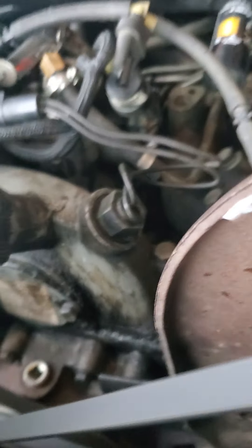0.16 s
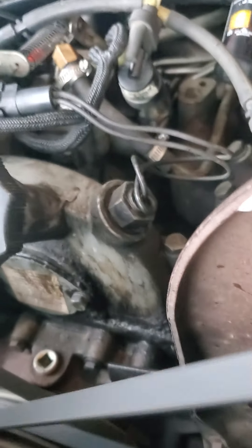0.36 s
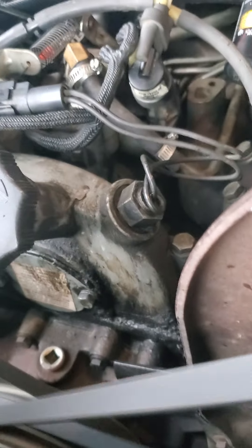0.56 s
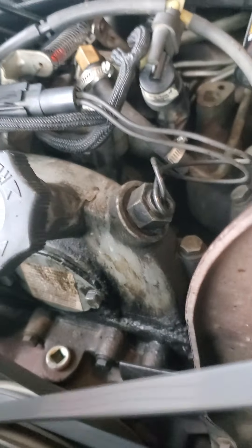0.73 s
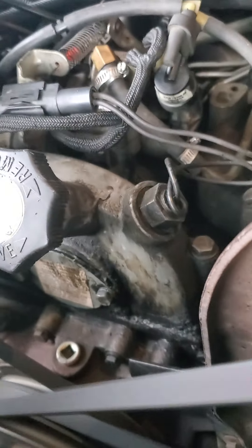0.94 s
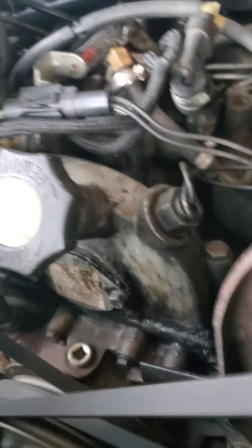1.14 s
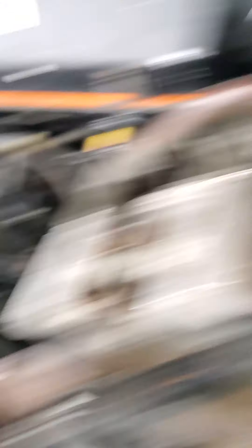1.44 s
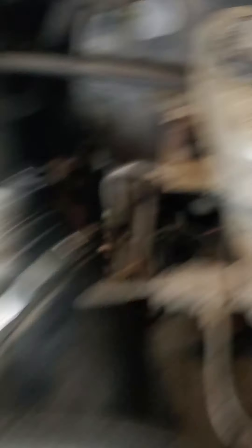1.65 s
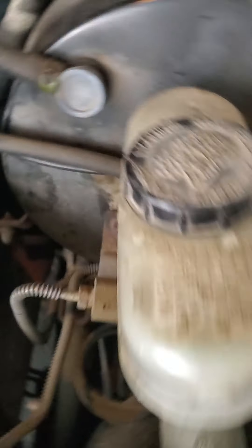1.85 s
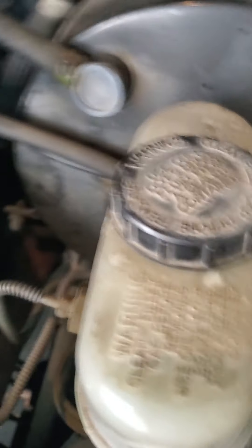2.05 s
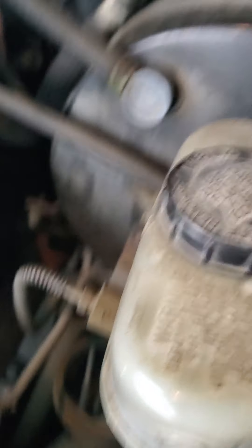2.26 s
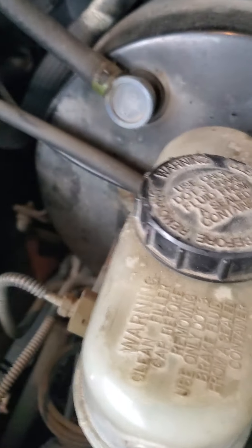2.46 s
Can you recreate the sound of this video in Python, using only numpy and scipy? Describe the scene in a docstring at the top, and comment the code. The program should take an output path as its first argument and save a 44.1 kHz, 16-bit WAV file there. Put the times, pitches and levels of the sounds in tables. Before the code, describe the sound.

A four-cylinder diesel engine idles steadily throughout, very close in an open engine bay. Hard, bright metallic knocks come about seven a second, with quicker clatter and ticks between, over a wavering low drone and fan rush. Soft draught thumps hit the left side, mostly at 0.4-0.8 and 1.1-1.4 seconds. From 1.1 to 1.8 the microphone swings aside; rumble and rush thin, and a ringing clatter grows towards 2.5.

```python
"""Hard metallic knocks, about seven a second, ring out of a four-cylinder diesel idling in an open engine bay.
Firings and valve gear clatter between them: noise bursts shaped by the resonances of block and cover.
Below lie a drone of wavering low tones and damped swings; the fan's rush is filtered noise,
and its draught buffets the left port of the microphone.
Around the middle the microphone swings from above the engine to the side of the bay."""
import sys
import numpy as np
from scipy import signal
from scipy.fft import rfft, irfft
from scipy.io import wavfile
from scipy.ndimage import uniform_filter1d

SR = 44100
rng = np.random.default_rng(int(sys.argv[2]) if len(sys.argv) > 2 else 0)


def inscribe(sig):
    """Save sig as 16-bit PCM at rate SR to the path in sys.argv[1].

    A 1-D sig is mono; a 2-D sig holds one channel per row.
    Samples are clipped to [-1, 1] before scaling.
    """
    pcm = np.round(np.clip(np.atleast_2d(sig).T, -1, 1) * 32767)
    wavfile.write(sys.argv[1], SR, pcm.astype(np.int16))


N = 114660
T = np.arange(N) / SR
HZ = np.fft.rfftfreq(N, 1 / SR)

# In every "colour" table below the dB are relative: the filter is then scaled to unit power.
# Pairs of levels are (above the engine, at the side). A T60 is the time to fall by 60 dB.


def amp(db):
    """Turns decibels into a gain."""
    return 10 ** (np.asarray(db) / 20)


def unit(x):
    """Scales to rms 1."""
    return x / np.sqrt(np.mean(x ** 2) + 1e-20)


def read(points):
    """Reads a table over log frequency, at every frequency bin."""
    hz, value = np.transpose(points)
    return np.interp(np.log(HZ + 1), np.log(hz), value)


def over_time(points):
    """Reads a table of levels in dB over time and returns the gain at every sample."""
    return amp(np.interp(T, *np.transpose(points)))


def add(mix, s, sound):
    """Mixes a sound in at time s, cutting off what lies outside the scene."""
    at = round(s * SR)
    sound = sound[:, max(-at, 0):]
    part = mix[:, max(at, 0):][:, :sound.shape[1]]
    part += sound[:, :part.shape[1]]


def slow(rate_hz):
    """A smooth random wander of rms 1."""
    noise = rfft(rng.standard_normal(N))
    return unit(irfft(noise * np.exp(-(HZ / rate_hz) ** 2), N))


SWING_START_S, SWING_END_S = 1.096, 1.78


def swing(above, side):
    """Passes from one value to the other as the microphone moves."""
    return np.interp(T, [SWING_START_S, SWING_END_S], [above, side])


# How alike the left and right sounds are. Each row: frequency in Hz, likeness (1 same, 0 unrelated).
PORT_LIKENESS = [(60, 0.29), (300, 0.78), (700, 0.6), (1300, -0.16), (2400, -0.012), (16000, 0.023)]


def colour(x, points, modes=()):
    """A causal filter with resonances; the likeness of the two ports depends on frequency."""
    db = read(points)
    for hz, width, lift_db in modes:
        db = db + lift_db / (1 + (2 * (HZ - hz) / width) ** 2)
    log_gain = np.log(unit(amp(db)))
    # Folding the cepstrum gives the minimum-phase response: it starts at once, with no pre-echo
    fold = 2. * (np.arange(N) < N // 2)
    fold[0] = 1
    cepstrum = irfft(log_gain, N) * fold
    response = irfft(np.exp(rfft(cepstrum)), N)[:4096]
    # Each port takes in a share of the other
    angle = np.arcsin(np.clip(read(PORT_LIKENESS), -1, 1)) / 2
    z = rfft(x)
    ports = irfft(np.cos(angle) * z + np.sin(angle) * z[::-1], N)
    return signal.oaconvolve(ports, response[None], axes=1)[:, :N]


def body(x, points, modes):
    """A struck part whose resonances stand out differently at the two places."""
    above = colour(x, points, [(hz, width, db) for hz, width, db, _ in modes])
    side = colour(x, points, [(hz, width, db) for hz, width, _, db in modes])
    return swing(0.88, 0) * above + swing(0, 0.93) * side


ROUGHNESS_DB = 2.5


def burst(envelope, size=24):
    """A dense noise burst with a rough, randomly fluctuating level, its power spread evenly over frequency."""
    wander = unit(uniform_filter1d(rng.standard_normal(len(envelope)), size))
    rough_level = amp(ROUGHNESS_DB * wander)
    z = rfft(envelope * rough_level * rng.standard_normal((2, len(envelope))))
    z = z / np.sqrt(uniform_filter1d(abs(z) ** 2, 2 * size, axis=1))
    return np.linalg.norm(envelope) * irfft(z)[:, :len(envelope) // 2]


def strike(t, rise_s, hold_s, t60_s):
    """The loudness of a blow: a fast rise, a short hold and a fall."""
    return np.minimum(t / rise_s, 1) * amp(-60 * np.maximum(t - hold_s, 0) / t60_s)


def blows(times, levels_db, rise_s, hold_s, t60_s, alike):
    """One part struck repeatedly: nearly the same ring each time, changing with the listening place."""
    envelope = strike(np.arange(4096) / SR, rise_s, hold_s, t60_s)
    above, side = burst(envelope), burst(envelope)
    turn, out = swing(0, np.pi / 2), np.zeros((2, N))
    for s, db in zip(times, levels_db):
        angle = np.interp(s, T, turn)
        same = np.cos(angle) * above + np.sin(angle) * side
        ring = np.sqrt(alike) * same + np.sqrt(1 - alike) * burst(envelope)
        add(out, s, amp(db) * ring)
    return out


WHIRR_SHARE, WHIRR_TOP_HZ = .45, 1800  # the gears' share of the power at the lowest pitches, and its reach


def whirr():
    """Air noise mixed with the churn of the gears, which comes round again in every cycle."""
    starts = np.round(np.transpose(KNOCKS)[0] * SR).astype(int)
    latest = np.searchsorted(starts, np.arange(N), "right") - 1
    since = np.arange(N) - starts[latest]  # samples since the latest knock
    air, above, side = rng.standard_normal((3, 2, N))
    turn = swing(0, np.pi / 2)
    share = WHIRR_SHARE * np.exp(-(HZ / WHIRR_TOP_HZ) ** 2 / 2)
    gears = np.cos(turn) * above[:, since] + np.sin(turn) * side[:, since]
    return irfft(np.sqrt(share) * rfft(gears) + np.sqrt(1 - share) * rfft(air), N)


# Tone of the rush. Each row: frequency in Hz, level in dB per Hz.
RUSH_COLOUR = [(71, -36), (120, 2), (418, -7.5), (483, -4), (712, -5), (1320, -6.5), (1460, -9),
               (1860, 0.5), (2340, -7.5), (6500, -22.5), (7980, -27.5), (15000, -28), (16000, -34)]
# Draught on the left port. Each row: start in seconds, length in seconds, level in dB.
BUFFETS = [(0, 0.039, -15), (0.439, .1, -16.5), (0.554, .015, -5.5), (0.602, 0.016, -10.5),
           (0.703, .045, -13.5), (0.754, 0.053, -17.5), (1.116, 0.085, -13), (1.327, 0.04, -10)]
# Tone of the buffets. Each row: frequency in Hz, level in dB per Hz.
BUFFET_COLOUR = [(15, -14.5), (45, -8.5), (85, 3.5), (150, -11), (300, -12), (600, -19.5), (2000, -47)]
RUSH_DB = (-22, -25.5)


def fan():
    """Steady rush of air and gears, and short buffets of noise on the left port."""
    gusts = np.zeros((2, N))
    for s, length, db in BUFFETS:
        puff = np.hanning(max(int(length * SR), 2))
        add(gusts, s, amp(db) * np.array([puff, 0 * puff]))
    rush = amp(swing(*RUSH_DB)) * colour(whirr(), RUSH_COLOUR)
    return rush + gusts * colour(rng.standard_normal((2, N)), BUFFET_COLOUR)


# Single eddies. Each row: start in seconds, pitch in Hz, level in dB.
THUMPS = [(0.468, 65, -0.5), (.561, 85.5, -7), (.717, 69.7, -4), (1.157, 53.6, -13), (1.9181, 97, -2.5)]
THUMP_RISE_S, THUMP_T60_S = 0.0016, 0.074


def thumps():
    """Single eddies hit the left port: low swings of pressure that die away quickly."""
    t, out = np.arange(SR // 10) / SR, np.zeros((2, N))
    for s, hz, db in THUMPS:
        envelope = amp(db) * strike(t, THUMP_RISE_S, 0, THUMP_T60_S)
        push = envelope * np.sin(2 * np.pi * hz * t)
        add(out, s, np.array([push, 0 * push]))
    return out


# Low lines. Each row: pitch in Hz, level in dB above the engine, level in dB at the side.
DRONE_LINES = [(55.2, -31.5, -31), (74.56, -27.5, -43), (105.4, -29.5, -38), (164.6, -62, -40)]
# Tone of the rumble. Each row: frequency in Hz, level in dB per Hz.
RUMBLE_COLOUR = [(15, -58), (30, -46), (48, 4.5), (75, -2), (105, 3.5), (135, -11), (200, -18),
                 (350, -18.5), (900, -55.5)]
DRONE_WAVER_DB, DRONE_WAVER_TURNS, RUMBLE_DB = 1.5, .12, (-24, -33.5)


def drone():
    """Low lines of the crank and its driven parts, wavering in level and phase, in a rumble."""
    lines = np.zeros(N)
    for hz, above, side in DRONE_LINES:
        level = amp(swing(above, side) + DRONE_WAVER_DB * slow(4.8))
        turns = hz * T + rng.random() + DRONE_WAVER_TURNS * slow(2.3)
        lines += level * np.sin(2 * np.pi * turns)
    rumble = amp(swing(*RUMBLE_DB)) * colour(rng.standard_normal((2, N)), RUMBLE_COLOUR)
    return np.sqrt(2) * lines + rumble  # sqrt(2) makes the line levels rms


# Firings push the engine on its mounts. Each row: seconds after the knock, level in dB.
FIRINGS = [(.002, 2.5), (0.0442, 1.5), (0.0735, -4.5), (0.108, 2)]
PUSH_HZ, PUSH_RISE_S, PUSH_T60_S, PUSH_DB = 70.3, 0.00045, 0.11, (-19.5, -21)


def throb():
    """Each firing starts a short, low, damped swing of the whole engine."""
    t, out = np.arange(SR // 8) / SR, np.zeros((2, N))
    push = -strike(t, PUSH_RISE_S, 0, PUSH_T60_S) * np.sin(2 * np.pi * PUSH_HZ * t)
    for start, _ in KNOCKS:
        for delay, db in FIRINGS:
            add(out, start + delay, amp(db) * push[None])
    return amp(swing(*PUSH_DB)) * out


# Firings, injectors and valve gear, every cycle. Each row: seconds after the knock, thud in the block in dB,
# ringing cover in dB, tick in dB, hold in seconds.
STROKES = [(0, 2.5, -1, 4, 0.0036), (.019, 3, -5.5, -0.5, .004), (0.0386, 0, 2, 3, 0.0044),
           (.056, 0, -4, -5, 0.0038), (0.071, -1, -7, 0, 0.0068), (0.09, -2, -3.5, -1.5, 0.01),
           (0.1118, -0.5, -2.5, -2.5, .0055), (0.1276, 3.5, 4, 4, 0.0048)]
# Tones of block, cover and tick. Each row: frequency in Hz, level in dB per Hz.
BLOCK_COLOUR = [(100, -10.5), (250, -5), (480, -5), (680, -9), (900, -5), (1300, -2.5), (1600, -1.5),
                (2100, -7), (3000, -43), (16000, -54)]
COVER_COLOUR = [(300, -42), (1200, -21.5), (1600, -9), (1820, 6.5), (2100, 1.5), (2500, -20), (5000, -30.5)]
TICK_COLOUR = [(500, -0.5), (1500, -38), (2300, 4), (3200, -2), (4200, -6), (6300, -19), (8000, -37),
               (16000, -31)]
# Resonances of the block. Each row: pitch in Hz, width in Hz, lift in dB above the engine,
# lift in dB at the side.
BLOCK_MODES = [(263.8, 6.7, 8, 20), (478.6, 13, 11.5, 4.5), (866, 64, 9, 12), (1053, 29, 7, 2),
               (1271, 52, 9, -2), (1323, 144, 0, 12.5), (1603, 480, 8.5, -7)]
# Levels of the cover's clearest note and of the clatter. Each row: time in seconds, level in dB.
RING_LEVEL = [(0, -28), (.8, -23.5), (1.25, -28), (1.7, -31), (1.95, -22.5), (2.2, -20), (2.55, -19)]
CLATTER_LEVEL = [(0, 2), (.3, 3), (.55, 1), (.8, 2), (1.2, 1.5), (1.7, -0.5), (2.1, 0), (2.55, 4)]
BLOCK_DB, COVER_DB, TICK_DB = (-19.5, -25.5), (-22, -24), (-27, -27)
BLOCK_T60_S, COVER_T60_S, TICK_T60_S = .043, .04, .052
STROKE_RISE_S, STROKE_ALIKE, STROKE_SPREAD_DB, THUD_LAG_S = 0.00046, .88, 1, .0028
RING_HZ, RING_T60_S = 1830, 0.052
RING_SPREAD_TURNS = 0.25  # phase spread between the ports
RING_DB_PER_DB = 1.4  # the note grows faster than the blow


def clatter():
    """Strokes tick, ring a cover and thud in the block; the cover's clearest note needs a hard blow."""
    block, cover, tick, ring = np.zeros((4, 2, N))
    cycles, t = np.transpose(KNOCKS)[0], np.arange(SR // 10) / SR
    for delay, thud_db, cover_db, tick_db, hold in STROKES:
        times = cycles + delay
        force_db = STROKE_SPREAD_DB * rng.standard_normal(len(cycles))
        block += blows(times + THUD_LAG_S, thud_db + force_db, STROKE_RISE_S, hold, BLOCK_T60_S, STROKE_ALIKE)
        cover += blows(times, cover_db + force_db, STROKE_RISE_S, hold, COVER_T60_S, STROKE_ALIKE)
        tick += blows(times, tick_db + force_db, STROKE_RISE_S, hold, TICK_T60_S, STROKE_ALIKE)
        phase = rng.random() + RING_SPREAD_TURNS * rng.standard_normal((2, 1))
        note = strike(t, STROKE_RISE_S, hold, RING_T60_S) * np.sin(2 * np.pi * (RING_HZ * t + phase))
        for s, db in zip(times, cover_db + force_db):
            add(ring, s, amp(RING_DB_PER_DB * db) * note)
    rattle = amp(swing(*BLOCK_DB)) * body(block, BLOCK_COLOUR, BLOCK_MODES)
    rattle += amp(swing(*COVER_DB)) * colour(cover, COVER_COLOUR)
    rattle += amp(swing(*TICK_DB)) * colour(tick, TICK_COLOUR)
    return over_time(CLATTER_LEVEL) * rattle + over_time(RING_LEVEL) * ring


# One knock per cycle. Each row: start in seconds (the first lies before the scene begins), level in dB.
KNOCKS = [(-.0623, 2), (0.081, 2), (0.2247, 1.5), (0.368, 1.5), (0.5114, 1.5), (.656, .5), (.8, 2),
          (0.9434, -1), (1.0869, 1.5), (1.2324, 1), (1.3759, 2), (1.5198, 1.5), (1.6627, 0.5), (1.8065, 0),
          (1.9506, 1), (2.0947, 0), (2.2376, 0.5), (2.3809, 1.5), (2.5253, 2.5)]
# Tone of the knock. Each row: frequency in Hz, level in dB per Hz.
KNOCK_COLOUR = [(200, -21), (600, -25), (1050, -8.5), (1800, -10), (2500, -5), (3200, -1), (4100, -8),
                (4600, -3.5), (6600, -7.5), (7800, -17.5), (11000, -18.5), (16000, -29)]
# Resonances of the struck part. Each row: pitch in Hz, width in Hz, lift in dB above the engine,
# lift in dB at the side.
KNOCK_MODES = [(914, 83, 7, 21), (1144, 96, 13.5, 8), (1364, 116, -10, 15.5), (1580, 40, 3, 5),
               (2070, 230, 14, 10.5), (2528, 110, 10.5, 11.5), (3085, 350, 11, 0.5), (3352, 120, 2, 7.5),
               (3750, 85, 9, 10.5), (4430, 300, 3.5, 4.5), (5520, 130, 7, -0.5), (6600, 700, 3, 1.5)]
KNOCK_DB, KNOCK_RISE_S, KNOCK_HOLD_S, KNOCK_T60_S = -14, 0.00028, 0.0047, 0.048
KNOCK_ALIKE = .88  # share of the power that every knock has in common


def knock():
    """The hard, bright blow once in each cycle: a noise burst through the struck part's resonances."""
    times, levels_db = np.transpose(KNOCKS)
    hits = blows(times, levels_db, KNOCK_RISE_S, KNOCK_HOLD_S, KNOCK_T60_S, KNOCK_ALIKE)
    return amp(KNOCK_DB) * body(hits, KNOCK_COLOUR, KNOCK_MODES)


# Level of throb and drone together. Each row: time in seconds, level in dB.
DRONE_LEVEL = [(0, 2), (.25, -1.5), (.55, 2), (.75, 1), (.9, -5.5), (1.17, 3.5), (1.3, -2.5), (1.8, 0.5),
               (2.1, -1.5), (2.6, 0.5)]
# Balance of the ports at the two places. Each row: frequency in Hz, left minus right in dB.
BALANCE_ABOVE = [(60, 3), (110, -3.5), (200, 4), (380, 2), (700, -4), (1290, -9.5), (2380, 1.5), (4400, 1),
                 (8120, 1.5), (15000, 2.5)]
BALANCE_SIDE = [(60, 1), (110, -2), (200, 4), (380, -3.5), (700, 3), (1290, -4), (2380, -0.5), (4400, 2),
                (8120, -0.5), (15000, 4)]


def scene():
    """The engine as the two ports hear it from the two places."""
    low = over_time(DRONE_LEVEL) * (throb() + drone())
    z = rfft(fan() + thumps() + low + clatter() + knock())
    above, side = (irfft(z * amp(np.array([read(balance), -read(balance)]) / 2), N)
                   for balance in (BALANCE_ABOVE, BALANCE_SIDE))
    moved = swing(0, 1)
    return (1 - moved) * above + moved * side


LOW_CUT_HZ, EDGE_HZ = 38, 16100


def record(dry):
    """Low cut, clipping at full scale, then a steep treble cut."""
    high_pass = signal.butter(2, LOW_CUT_HZ, "high", fs=SR, output="sos")
    cut = signal.sosfilt(high_pass, dry)
    low_pass = signal.firwin(511, EDGE_HZ, window=("kaiser", 9), fs=SR)
    return signal.oaconvolve(np.clip(cut, -1, 1), low_pass[None], "same")


dry = scene()
out = record(dry)
inscribe(out)
```